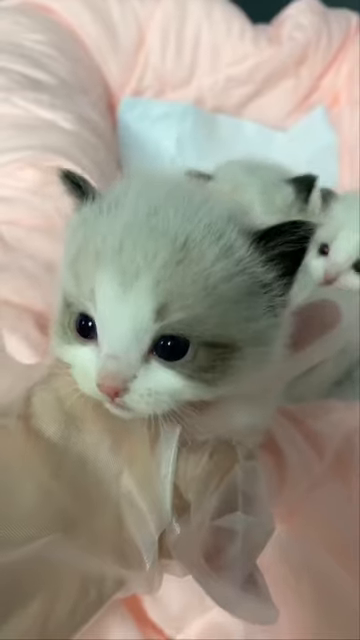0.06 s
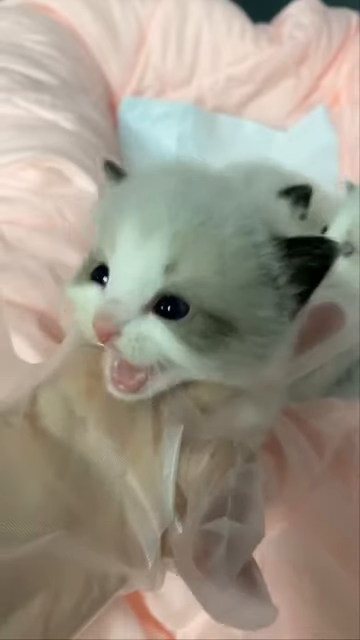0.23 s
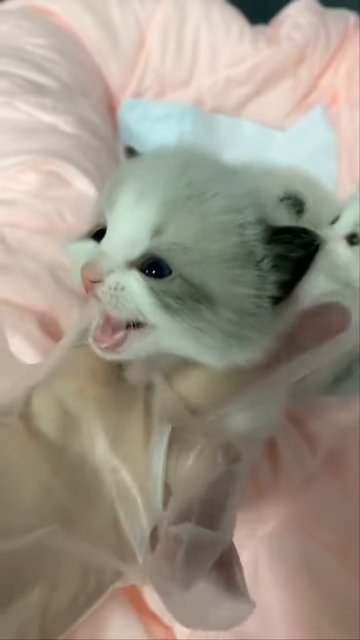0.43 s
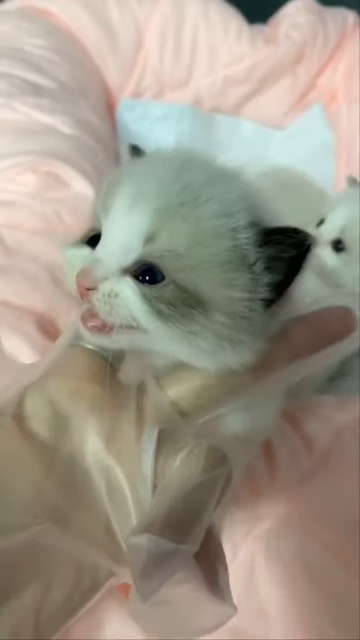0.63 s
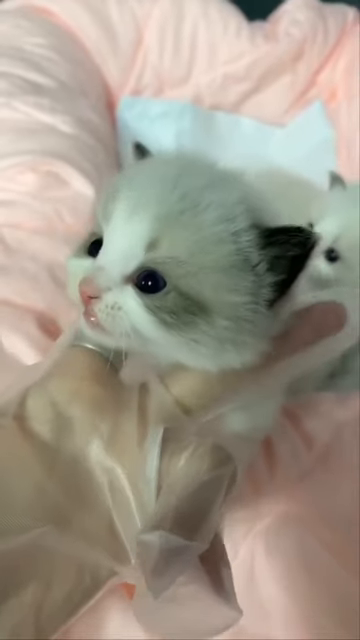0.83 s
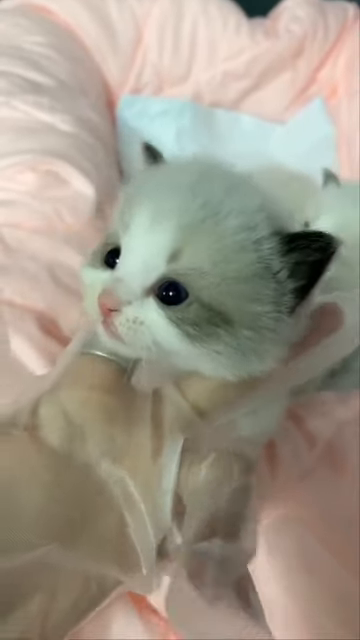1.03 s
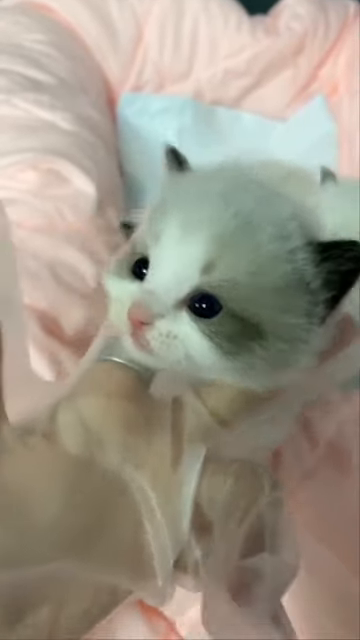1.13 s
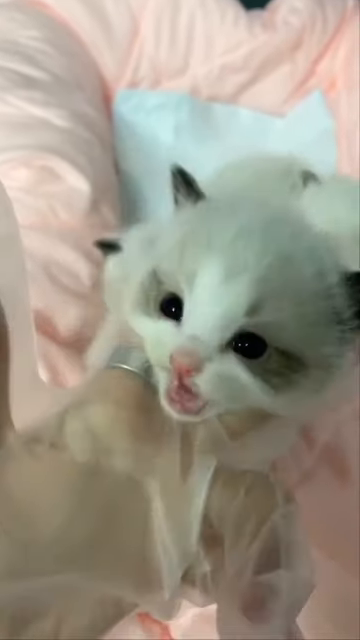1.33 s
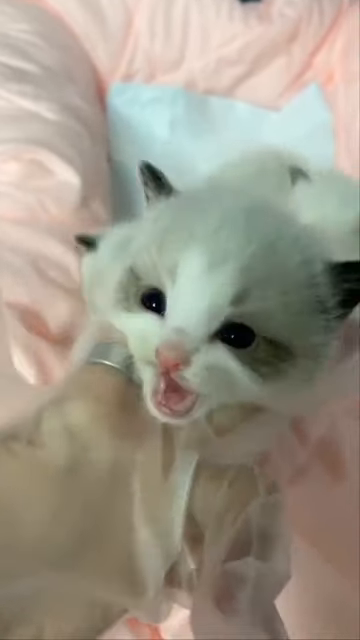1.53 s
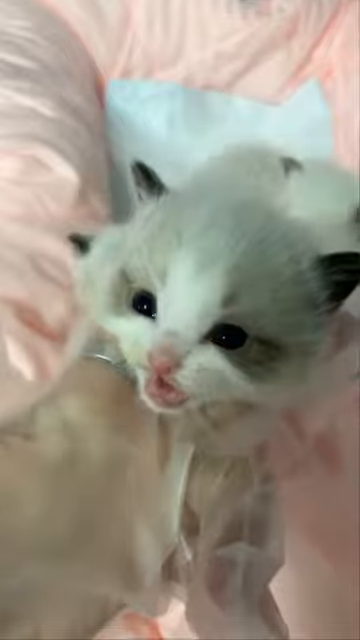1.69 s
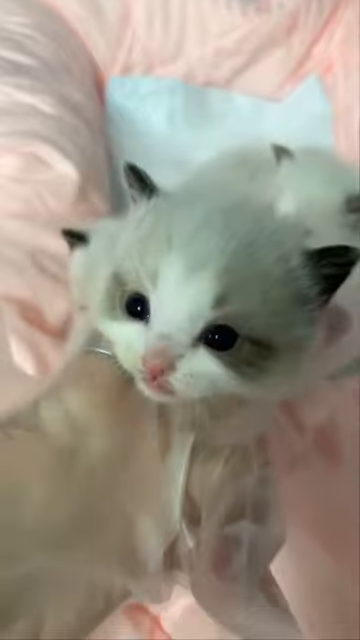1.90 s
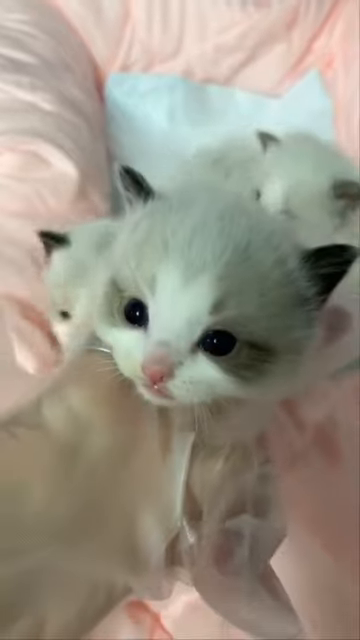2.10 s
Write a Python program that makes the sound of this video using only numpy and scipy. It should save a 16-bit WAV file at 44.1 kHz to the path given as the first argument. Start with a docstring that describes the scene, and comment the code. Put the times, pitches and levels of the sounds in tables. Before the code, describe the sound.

A young kitten mews twice, close by in a quiet room. A littermate's faint, thin mew fades in the first 0.3 seconds. From 0.2 to 0.85 seconds comes the louder high mew, rising, rasping near its peak, then sinking. A smoother one arches from 1.3 to 1.9 seconds, with a tiny wet tongue click near its end. Both finish in a small puff of air.

```python
"""A young kitten, close by in a quiet room, mews twice; a littermate's thinner mew is just dying away.
Its vibrating vocal folds make a nearly pure tone that arches up and sinks, rasps and catches near its
height, drops about an octave as the voice lets go and ends in a small puff of air.
Tiny wet tongue clicks, faint rustles and a low throb go with it."""
import sys
import numpy as np
from scipy import signal
from scipy.fft import rfft, irfft
from scipy.io import wavfile

SR = 44100
rng = np.random.default_rng(int(sys.argv[2]) if len(sys.argv) > 2 else 0)


def pcm_store(signal):
    """Save signal as 16-bit PCM."""
    levels = np.round(np.clip(np.atleast_2d(signal), -1, 1) * 32767)
    wavfile.write(sys.argv[1], SR, levels.astype(np.int16).T)


N = 94815
TIME = np.arange(N) / SR


def from_db(db):
    """Turn decibels into a gain to multiply by."""
    return 10 ** (np.asarray(db) / 20)


def unit_power(x):
    """Scale a signal to an average power of 1."""
    return x / np.sqrt(np.mean(x ** 2) + 1e-20)


def in_time(rows):
    """Join a table's timed points with straight lines: one curve for each column after the time."""
    times, *columns = np.transpose(rows)
    return [np.interp(TIME, times, column) for column in columns]


def at_hz(spectrum, hz):
    """Read a spectrum's decibels at any frequency, on a log-frequency axis."""
    points_hz, db = np.transpose(spectrum)
    return np.interp(np.log(hz + 1), np.log(points_hz), db)


def drift(hz):
    """A smooth random wobble, about 1 in size; a higher hz makes it quicker."""
    pole = np.exp(-2 * np.pi * hz / SR)
    wobble = signal.lfilter([1], [1, -2 * pole, pole * pole], rng.standard_normal(N + SR))
    return unit_power(wobble[SR:])


def noise(spectrum):
    """Steady noise of power 1, shaped by a spectrum."""
    hz = np.arange(N // 2 + 1) * SR / N
    white = rfft(rng.standard_normal(N))
    return unit_power(irfft(white * from_db(at_hz(spectrum, hz)), N))


def swell(middle_s, half_s):
    """A bell-shaped rise and fall around a moment."""
    return np.exp(-np.minimum(((TIME - middle_s) / half_s) ** 2, 50))


def resonate(x, hz, width_hz):
    """Let a sound ring at one frequency, which passes at full strength."""
    pole = np.exp(-np.pi * width_hz / SR)
    feedback = [1, -2 * pole * np.cos(2 * np.pi * hz / SR), pole * pole]
    return signal.lfilter(np.array([1, 0, -1]) * (1 - pole * pole) / 2, feedback, x + 1e-18)


def running_phase(hz):
    """The angle a moving pitch has turned through, in radians."""
    return 2 * np.pi * np.cumsum(hz) / SR


def buzz(hz, fall_db, count):
    """A few harmonics (whole multiples of the pitch), each weaker than the last."""
    phase = running_phase(hz)
    return sum(from_db(-fall_db * k) * np.sin((k + 1) * phase) for k in range(count))


def room():
    """The dull, steady noise of a quiet room."""
    # the room's tone (frequency [Hz], relative level [dB])
    spectrum = [(20, -4.5), (55, 3.5), (110, -9.5), (200, -9), (400, -13), (550, -20.5), (1000, -24.5),
                (2000, -32), (3000, -50.5), (5000, -45), (7500, -65.5), (10000, -56), (14000, -58)]
    return from_db(-55) * noise(spectrum)


def throb():
    """A low hum of unsteady pitch swells and stops."""
    # the hum's rise and fall (time [s], level [dB])
    loudness = [(.48, -83), (.56, -50.5), (.8, -49.5), (.92, -46), (1.03, -45), (1.13, -51), (1.18, -70.5)]
    pitch_hz = 36.2 * (1 + 0.068 * drift(34))
    return from_db(in_time(loudness)[0]) * buzz(pitch_hz, fall_db=9, count=3)


def rustles():
    """Faint, high noise comes and goes."""
    # each rustle (time [s], half length [s], level [dB])
    moments = [(0.166, 0.052, -74), (0.503, 0.021, -66.5), (1.305, 0.0323, -74.5), (1.708, .04, -75)]
    # their thin tone (frequency [Hz], relative level [dB])
    spectrum = [(3500, -35), (5000, -1), (6500, -5.5), (7500, -35), (9000, 1.5), (11000, 2.5), (12800, -2),
                (14000, -31)]
    return sum(from_db(db) * swell(at_s, half_s) for at_s, half_s, db in moments) * noise(spectrum)


def mew(curve, colour, rough, dip):
    """The vocal folds' harmonics slide through a fixed tone colour; hoarseness shakes them and adds air."""
    # air noise in a hoarse voice (frequency [Hz], relative level [dB])
    rasp_spectrum = [(1000, -27), (1700, -4.5), (2200, 2.5), (2800, -15), (3400, -41.5), (4200, 2),
                     (5000, -6), (6300, -2.5), (6900, -24.5), (7600, -45.5), (8500, -37), (11000, -5),
                     (13200, -8.5), (14200, -38)]
    attack_s, release_s = 0.005, 0.0015
    jitter_hz, waver_hz = 230, 59  # speeds of the quick and the slower wobble
    pitch, fundamental_db, overtone_db, treble_db = in_time(curve)
    fade_in = np.clip(1 + (TIME - curve[0][0]) / attack_s, 0, 1)
    fade_out = np.clip(1 + (curve[-1][0] - TIME) / release_s, 0, 1)
    pitch = pitch * (1 - dip + 0.023 * rough * drift(jitter_hz) + .0022 * drift(waver_hz))
    phase = running_phase(pitch)
    voice = from_db(fundamental_db + 0.58 * drift(waver_hz)) * np.sin(phase)
    for k in range(2, 11):
        hz = k * pitch
        treble_share = (1 + np.tanh((hz - 7700) / 250)) / 2  # the treble takes over around 7700 Hz
        db = (1 - treble_share) * overtone_db + treble_share * treble_db + at_hz(colour, hz)
        db -= 6 * max(k - 5, 0)  # harmonics above the fifth fall away
        voice += from_db(db + 0.88 * drift(waver_hz)) * np.sin(k * phase) * (hz < SR / 2)
    # when the voice catches, the pitch dips, the tone weakens and the rasp grows
    shake = from_db(rough * drift(jitter_hz) - 59.5 * dip)
    effort_db = (fundamental_db - fundamental_db.max() + overtone_db - overtone_db.max()) / 2
    crackle_db = 6.5 * drift(jitter_hz)
    rasp_db = -45.5 + effort_db + 72.5 * dip + crackle_db
    rasp = from_db(rasp_db) * rough * noise(rasp_spectrum) * (1 + 0.1 * np.sin(phase))
    return np.sin(fade_in * fade_out * np.pi / 2) ** 2 * (voice * shake + rasp)


def littermate():
    """Another kitten's thin, smooth mew sinks away."""
    # its voice (time [s], pitch [Hz], lowest tone [dB], overtones [dB], treble [dB]), before colouring
    curve = [(.004, 1856, -47, -41.5, -85), (.035, 1906, -49, -51.5, -82), (.075, 1902, -48, -49, -88),
             (.115, 1787, -49, -49.5, -105), (.18, 1701, -46.5, -62.5, -88), (.23, 1520, -54, -60, -85),
             (.268, 1516, -47, -62, -86)]
    # the overtones' colour, with a fixed hollow near 7.6 kHz (frequency [Hz], gain [dB])
    colour = [(3000, -5.5), (3800, 7.5), (5150, -24), (5600, -13), (5800, -10), (6700, -1), (7150, -22.5),
              (7700, -42), (9300, 2), (11400, 6), (13400, 7)]
    return mew(curve, colour, rough=.02, dip=0)


def tongue_clicks():
    """The wet tongue parts softly from the roof of the mouth, which rings for a millisecond."""
    # each click (time [s], peak level [dB], ring [Hz])
    clicks = [(.508, -46, 5700), (1.775, -33, 2900)]
    soften = signal.butter(6, 6000, fs=SR, output="sos")
    out = np.zeros(N)
    for at_s, db, hz in clicks:
        impulse = np.arange(N) == int(at_s * SR)
        tap = signal.sosfilt(soften, impulse + 1e-18)
        ring = resonate(tap, hz, width_hz=700) + resonate(tap, hz * 2.2, width_hz=700) / 2
        out += from_db(db) * ring / np.abs(ring).max()
    return out


def air_puffs():
    """Air flows through the kitten's small mouth and nose, with one hissing resonance."""
    # each puff (time [s], half length [s], air level [dB], hiss centre [Hz])
    puffs = [(0.863, 0.025, -56.5, 5580), (1.033, 0.036, -69.5, 5360), (1.287, 0.12, -71, 4890),
             (1.896, 0.029, -49.5, 4870)]
    # the breath's tone (frequency [Hz], relative level [dB])
    spectrum = [(500, 6), (1350, 3), (2000, 1.5), (2800, -4), (3400, -14.5), (4500, -13.5), (6000, -16.5),
                (7300, -42), (8600, -20.5), (11200, -22), (13500, -41)]
    air = noise(spectrum)
    out = np.zeros(N)
    for at_s, half_s, db, hz in puffs:
        hiss = from_db(-5.5) * unit_power(resonate(air, hz, width_hz=440))
        out += from_db(db) * swell(at_s, half_s) * (air + hiss)
    return out


def flutters():
    """Uneven beating of the vocal folds rings in the mouth's lowest resonance."""
    # each rough flutter (time [s], half length [s], level [dB], centre [Hz])
    bursts = [(0.288, .035, -44.5, 2735), (0.364, 0.04, -42, 2510), (0.377, 0.028, -59.5, 2450),
              (1.439, 0.036, -57.5, 2910), (1.535, 0.034, -62, 2846)]
    half_width_hz = 190
    out = np.zeros(N)
    for at_s, half_s, db, hz in bursts:
        band = signal.butter(3, [hz - half_width_hz, hz + half_width_hz], "band", fs=SR, output="sos")
        ring = unit_power(signal.sosfilt(band, rng.standard_normal(N)))
        out += from_db(db) * swell(at_s, half_s) * ring
    return out


def voice_catches():
    """The vocal folds slip suddenly and recover; gives the share of the pitch lost at each moment."""
    # each slip (time [s], recovery time [s], dip strength [share of pitch])
    slips = [(0.186, 0.0036, 0.15), (0.2978, .0016, 0.063), (0.3198, .005, 0.11), (0.3565, 0.00355, 0.066),
             (.376, 0.002, 0.1), (0.38, 0.0018, 0.089), (0.399, 0.0029, .1), (.4255, 0.0027, 0.11),
             (.4875, 0.0038, .018)]
    onset_s = .0013
    dip = np.zeros(N)
    for at_s, recovery_s, strength in slips:
        age_s = np.maximum(TIME - at_s, 0)
        dip += strength * np.minimum(age_s / onset_s, 1) * np.exp(-np.minimum(age_s / recovery_s, 50))
    return dip


def letting_go():
    """The vocal folds slacken at the end of each mew and give a short, low, falling chirp."""
    # each chirp (time [s], half length [s], pitch at its middle [Hz], level [dB])
    chirps = [(0.8473, 0.0034, 838, -34.5), (1.891, 0.004, 780, -31.5)]
    sag_per_s = 37
    out = np.zeros(N)
    for at_s, half_s, hz, db in chirps:
        pitch = hz * np.clip(1 - sag_per_s * (TIME - at_s), .5, 2)
        out += from_db(db) * swell(at_s, half_s) * buzz(pitch, fall_db=9, count=4)
    return out


def kitten():
    """The kitten's vocal folds sound two arching mews, the first one hoarser and catching."""
    # each mew (time [s], pitch [Hz], lowest tone [dB], overtones [dB], treble [dB]), before colouring
    first_curve = [(0.192, 1588, -37.5, -49.5, -84), (0.215, 1799, -29.5, -37, -54.5),
                   (0.265, 2120, -23.5, -31.5, -54), (0.305, 2243, -19.5, -30.5, -46.5),
                   (0.39, 2222, -16.5, -36.5, -46), (0.46, 2144, -17.5, -40.5, -50.5),
                   (0.52, 2106, -16.5, -45.5, -49), (0.6, 1975, -24, -54.5, -46),
                   (0.68, 1848, -31, -57, -50.5), (0.745, 1720, -33, -61.5, -51.5),
                   (0.79, 1614, -30, -63, -63), (0.82, 1473, -27, -59.5, -56.5),
                   (0.835, 1347, -28, -58.5, -58), (0.844, 1293, -29.5, -76, -40)]
    second_curve = [(1.319, 1554, -34, -40, -43.5), (1.326, 1599, -31, -35.5, -55),
                    (1.35, 1780, -30, -38.5, -53.5), (1.4, 2021.0, -28.5, -35, -54),
                    (1.445, 2088, -27, -36, -52.5), (1.5, 2049, -27, -39, -51),
                    (1.59, 2056, -25.5, -42.5, -49.5), (1.68, 1908, -25.5, -48.5, -56),
                    (1.77, 1769, -26.5, -57.0, -60), (1.81, 1630, -24, -57, -58.5),
                    (1.838, 1497, -22.5, -51.5, -61), (1.85, 1411, -23, -55.5, -66),
                    (1.854, 1246, -25.5, -60.5, -82.5), (1.862, 1333, -26, -60, -87),
                    (1.885, 1154, -29.5, -52.5, -75)]
    # the overtones' colour (frequency [Hz], gain [dB]),
    # with a fixed hollow near 7.6 kHz that runs through the whole sound
    first_colour = [(2500, 9.5), (4400, -6), (4750, -12), (5500, -9.5), (6100, -14), (6600, -30.5),
                    (7100, -21.5), (7650, -43.5), (8400, -5), (9300, -3.5), (10500, -4), (11600, -4),
                    (13300, -8), (14100, -25)]
    second_colour = [(2500, 9.5), (4200, -1), (4500, -18), (5300, -5), (6150, -7.5), (6700, -34),
                     (7100, -33), (7700, -45), (8300, -23), (9100, -7), (10200, -1), (11200, 4.5),
                     (12500, -3.5), (14100, -11.5)]
    # hoarseness through each mew (time [s], roughness [0-1])
    first_rough = [(.19, 0.42), (.22, 0.42), (.26, 0.62), (.32, 0.43), (.41, 0.28), (.455, 0.06), (.51, 0),
                   (.58, 0), (.78, 0), (.84, 0.42)]
    second_rough = [(1.32, .15), (1.385, 0.056), (1.42, 0.4), (1.465, 0.061), (1.6, .04), (1.67, 0.055),
                    (1.83, .07), (1.885, 0.32)]
    dip = voice_catches()
    first = mew(first_curve, first_colour, in_time(first_rough)[0], dip)
    second = mew(second_curve, second_colour, in_time(second_rough)[0], dip)
    # the folds briefly beat strong-weak, which adds a tone at half the pitch
    half_pitch = in_time(first_curve)[0] / 2
    undertone = from_db(-57) * swell(.37, half_s=.014) * np.sin(running_phase(half_pitch))
    return first + second + undertone


def scene():
    """The kitten in front, its littermate and the room behind, in one channel."""
    behind = room() + throb() + rustles() + littermate()
    in_front = tongue_clicks() + air_puffs() + flutters() + letting_go() + kitten()
    return (behind + in_front)[None]


def record(dry):
    """The sound fades in and out without a click; the highest treble is cut steeply."""
    fade_s, cutoff_hz = .004, 14100
    fade = np.clip(np.minimum(TIME, TIME[-1] - TIME) / fade_s, 0, 1)
    treble_cut = signal.ellip(10, .2, 80, cutoff_hz, fs=SR, output="sos")
    return signal.sosfilt(treble_cut, dry * fade)


dry = scene()
out = record(dry)
pcm_store(out)
```